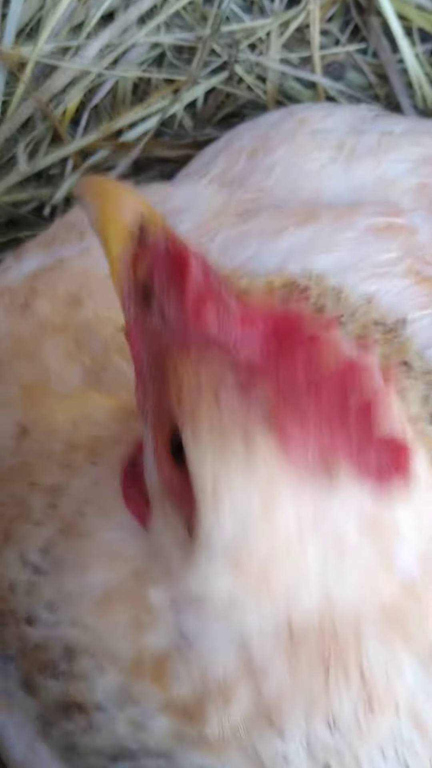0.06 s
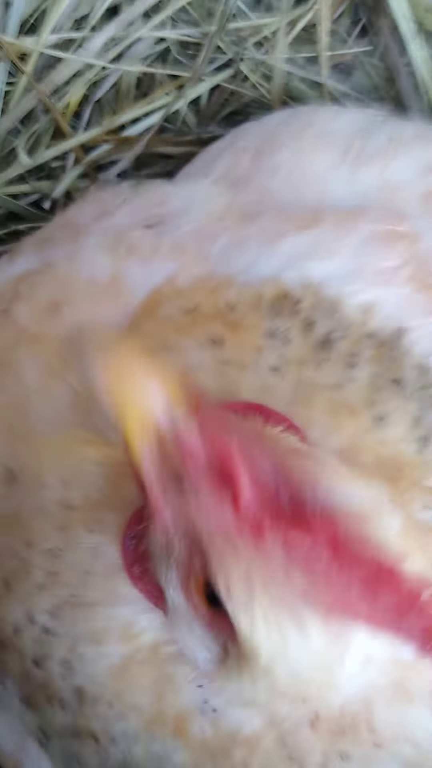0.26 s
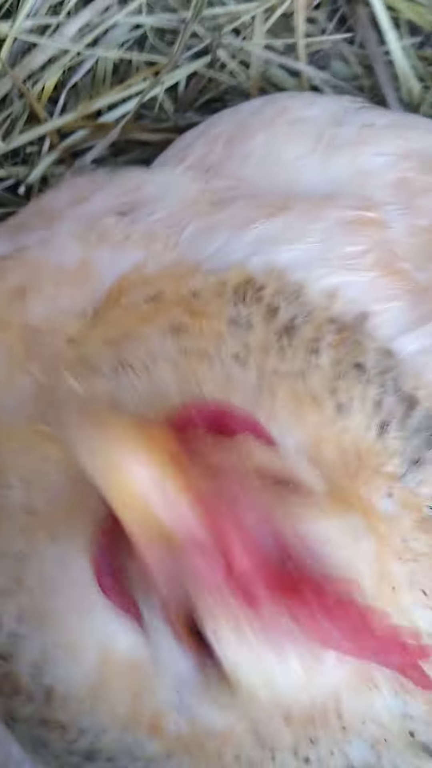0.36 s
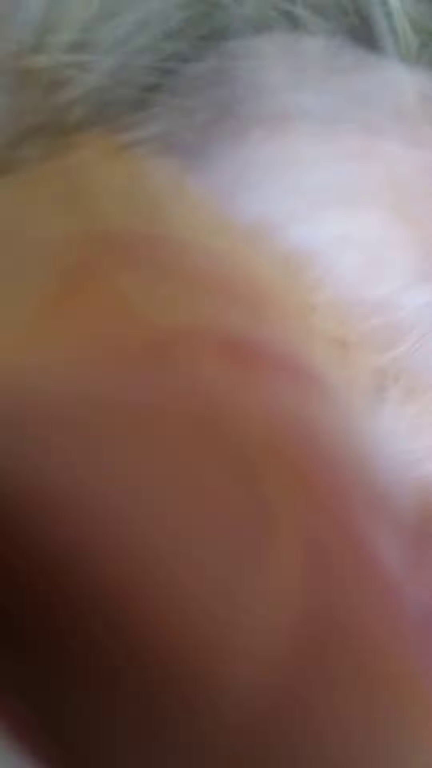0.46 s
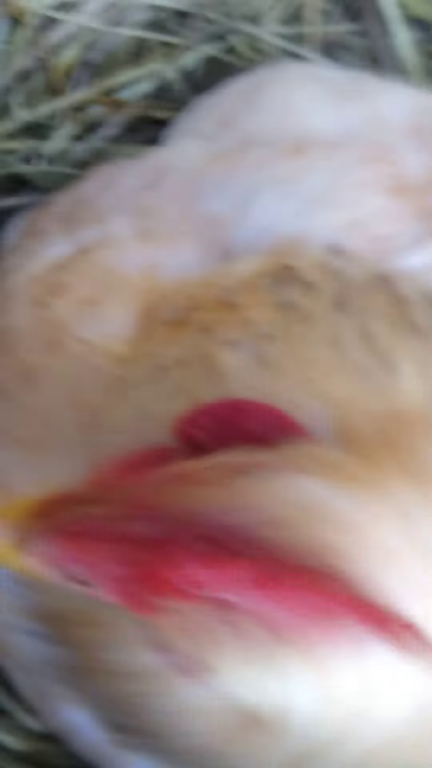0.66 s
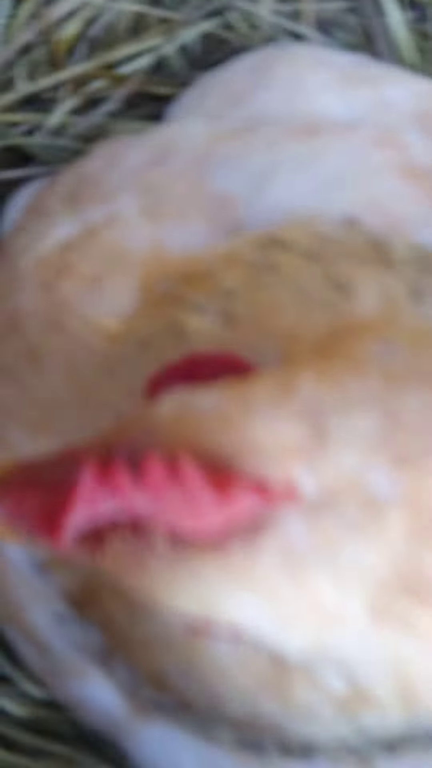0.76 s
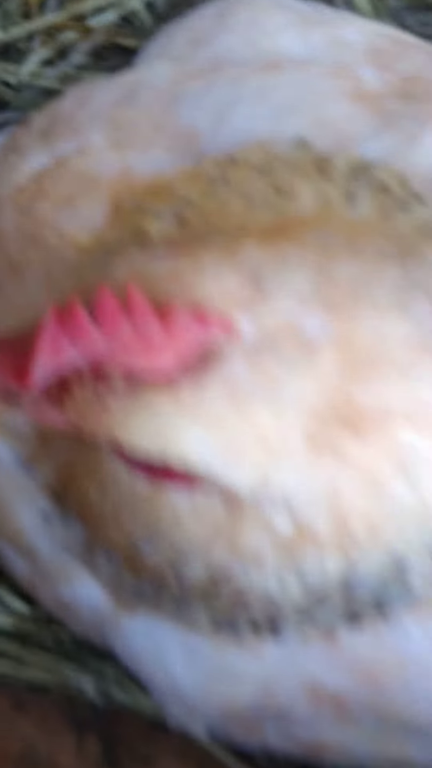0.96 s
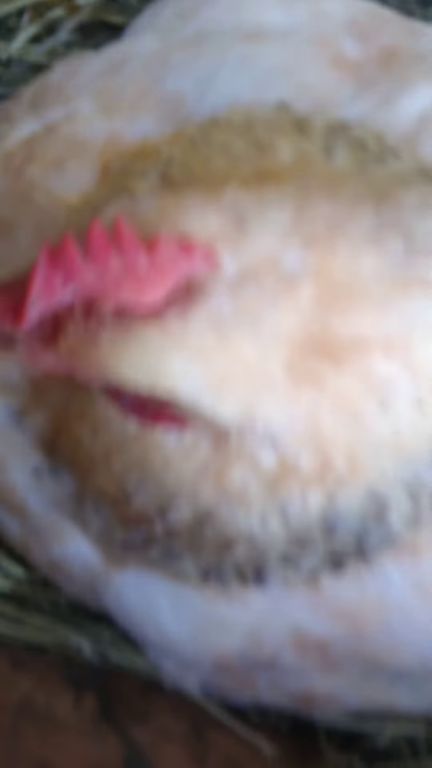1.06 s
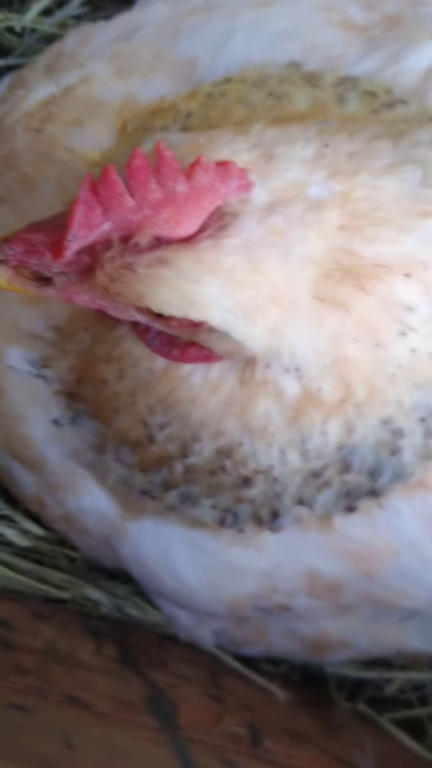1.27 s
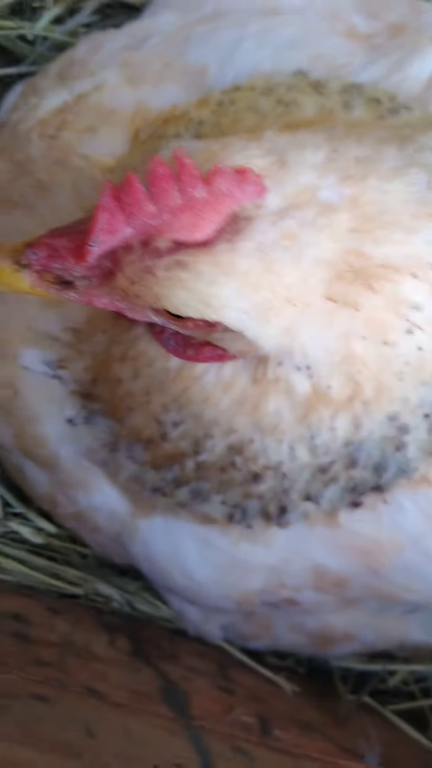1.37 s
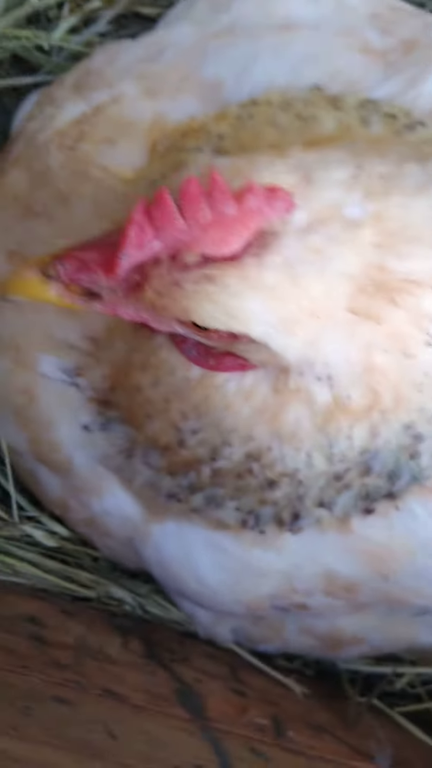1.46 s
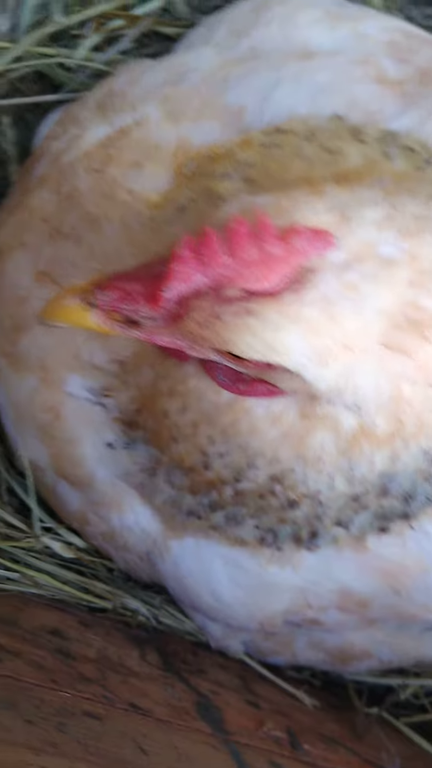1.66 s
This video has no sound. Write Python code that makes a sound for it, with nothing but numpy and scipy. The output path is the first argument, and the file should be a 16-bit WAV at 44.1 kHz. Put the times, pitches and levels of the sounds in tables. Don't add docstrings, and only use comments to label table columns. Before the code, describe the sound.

A nesting hen gives one short fluttering growl, then pecks the microphone with a loud overloaded crack

```python
import sys
import numpy as np
from scipy import signal
from scipy.fft import rfft, irfft
from scipy.io import wavfile
from scipy.ndimage import uniform_filter1d

SR = 44100
rng = np.random.default_rng(int(sys.argv[2]) if len(sys.argv) > 2 else 0)


def inscribe(sig):
    pcm = np.round(np.clip(np.atleast_2d(sig).T, -1, 1) * 32767)
    wavfile.write(sys.argv[1], SR, pcm.astype(np.int16))


def undo_db(level):
    steps = np.asarray(level, float) / 20
    return 10 ** steps


N = 74970

# frequency in Hz, level in dB per Hz.
RUMBLE_TONE = [(25, -35.5), (60, -9.5), (105, -2), (140, -11.5), (240, -41), (500, -38), (2500, -44),
               (16300, -54.5)]
# start in seconds, left level in dB, right level in dB, pitch in Hz, time to fall by 60 dB in seconds.
BUMPS = [(0.162, -46, -53, 575, 0.2), (0.228, -34, -33.5, 2350, 0.015), (.2285, -37, -48, 3640, .012),
         (.57, -47, -48, 423, .05), (.177, -34, -36, 520, .05), (.18, -35, -37, 930, .04),
         (.639, -27, -32, 450, .035), (.779, -52, -56, 780, .02), (.6142, -30, 2, 850, .005),
         (.6146, -30, -8, 2000, .004), (.6172, -30, -6, 650, .006), (.6268, -12, 1, 750, .0045),
         (.6275, -14, -8, 2200, .004), (.631, -34.5, -15.5, 372, 0.029), (.6375, -33, -25.5, 700, .01),
         (.84, -54.5, -58.5, 720, 0.027), (1.021, -51.5, -58.5, 900, 0.017), (1.036, -46.5, -69, 800, .02),
         (1.04, -49, -55, 544, 0.074), (1.103, -62.5, -69, 535, 0.12), (1.107, -53, -58, 220.8, 0.064),
         (1.151, -52, -58, 210, .05), (1.33, -72.5, -68.5, 1700, .04)]
# time in seconds, effort in dB, low voice in Hz,
# high voice in Hz, share of the high voice in dB, beak opening in dB.
GROWL = [
    (.172, -57.5, 520.4, 900, -2, -62),
    (.197, -28.5, 309.5, 625.9, 5.5, -29.5),
    (.245, -30.5, 430.2, 628.8, -8, -18.5),
    (.315, -29, 430.3, 637.1, -9.5, -14),
    (.345, -27, 373.2, 638.8, -4, -16),
    (0.364, -26.5, 437.4, 664.8, -10.5, -22.5),
    (0.439, -26.5, 422.2, 665.2, -7, -25),
    (.49, -22, 359.4, 662.7, 2.5, -23.5),
    (.536, -29.5, 351.6, 634.5, 3, -22.5),
]
# frequency in Hz, width in Hz, level in dB.
THROAT = [(145, 110, -12), (233.7, 96, -3), (398, 370, -3), (654.4, 340, -7), (900, 250, -5),
          (1174, 170, -7.5), (1420, 120, -11), (1660, 230, -10.5)]
# frequency in Hz, width in Hz, level in dB, change as it narrows in dB.
BEAK = [(2420, 1160, 2, -5), (3750, 2000, -7.5, -10), (5550, 1700, -22, 10.5), (9100, 12400, -1.5, 0.5)]
# frequency in Hz, left minus right in dB.
HEN_PAN = [(170, 3), (430, 3), (700, 3), (900, 0.5), (1200, -9), (1500, 4), (2400, 2), (5000, -2)]
# frequency in Hz, lead in radians.
HEN_LEAD = [(400, 0), (950, .2), (1150, 1.1), (1400, 2.1), (1850, 2.6), (2100, .4)]
# time in seconds, level in dB, left minus right in dB.
STRAW = [(0.202, -91, -17), (.51, -83, -11), (0.551, -50.5, -2), (.6, -53.5, 0.5), (0.653, -40, 1),
         (0.691, -51, 1.5), (.8, -55, 0.5), (0.878, -60.5, 5.5), (0.952, -74.5, 28), (1.019, -76, 18),
         (1.099, -84.5, 31.5), (1.25, -98, 11.5)]
# frequency in Hz, level in dB per Hz.
STRAW_TONE = [(150, 5), (230, 9), (450, -2), (1500, -6.5), (4000, -8), (8000, -8), (13000, -4),
              (16000, -14)]
# loudest moment in seconds, left level in dB, right level in dB,
# centre in Hz, length in seconds.
RATTLE = [(.229, -36, -36, 10000, .0008), (.612, -26, -30, 5000, .0012), (.6141, -3, -5, 8500, .0003),
          (.617, 0, -11, 10500, .0004), (.6232, -15, -34, 12500, .0002), (.6243, -7, -26, 12500, .0003),
          (.6272, -30, -9, 6000, .0002), (.628, -16, -5, 8500, .0002), (.63, -4, -26, 12000, .0003),
          (.631, -8, -30, 11000, .0003), (.6389, -7, -33, 12500, .0004), (.6453, -10, -36, 12500, .0003),
          (.6538, -18, -42, 11500, .0003), (1.285, -76, -66, 12000, .001), (1.395, -76, -64, 12000, .001),
          (1.51, -78, -68, 12000, .001)]
# frequency in Hz, level in dB, time to fall by 60 dB in seconds.
CASE = [(110, -12, .03), (190, -11, .025), (900, -11, .016), (1480, -8, .014), (1800, -7, .014),
        (2360, -5, .014), (3330, -9, .012), (4500, -10, .01)]
# frequency in Hz, level in dB, time to fall by 60 dB in seconds.
HUM = [(99, -16, .2), (99.5, -23, 1.1), (258, -20, .26), (200, -28, .3)]
# start in seconds, left level in dB, right level in dB, pitch factor.
KNOCKS = [
    (.779, -52, -56, 2.2),
    (1.02, -45, -53, .85),
    (1.0515, -33, -41, .98),
]
# frequency in Hz, level in dB, time to fall by 60 dB in seconds.
WOOD = [(249.5, 1, 0.046), (398, -12.5, 0.019), (582.4, -1, 0.029), (751, -2.5, 0.021), (961, -5, 0.02)]
# start in seconds, length in seconds, level in dB, start pitch in Hz, end pitch in Hz.
BIRDS = [
    (1.0, .009, -73, 4700, 4400),
    (1.062, 0.068, -70, 2350, 3700),
    (1.13, 0.0086, -64, 4550, 2480),
    (1.143, 0.048, -70, 3550, 2800),
    (1.219, 0.0081, -59.5, 4297, 2478),
    (1.252, .009, -59, 7650, 5750),
    (1.288, 0.008, -65, 7600, 5800),
    (1.61, 0.09, -84, 5020, 4000),
]


def evened(x):
    return x / np.sqrt(np.mean(x ** 2) + 1e-20)


def read(points, hz):
    f, value = np.transpose(points)
    return np.interp(np.log(hz + 1), np.log(f + 1), value)


def sides(left_db, right_db):
    return undo_db([[left_db], [right_db]])


def add(mix, s, sound):
    part = mix[:, round(s * SR):][:, :sound.shape[1]]
    part += sound[:, :part.shape[1]]


def resonate(x, hz, width):
    turn = np.exp(2j * np.pi * hz * np.arange(x.shape[-1]) / SR)
    r = np.exp(-np.pi * width / SR)
    return 2 * (turn * signal.lfilter([1 - r], [1, -r], x / turn)).real


def resonate_twice(x, hz, width):
    return resonate(resonate(x, hz, width), hz, width)


def ring(modes, t, factor=1):
    return sum(undo_db(db - 60 * t / t60) * np.sin(2 * np.pi * hz * factor * t) for hz, db, t60 in modes)


def hiss(tone, patchy_db, flicker_db):
    frames, hz = N // 128 + 5, np.fft.rfftfreq(512, 1 / SR)
    a, b, c, d, patches = rng.standard_normal((frames, 257, 5)).T
    patches = uniform_filter1d(patches, size=8, axis=0)
    patches = evened(uniform_filter1d(patches, size=12, axis=1))
    flicker = evened(uniform_filter1d(rng.standard_normal(frames), size=3))
    level_db = read(tone, hz)[:, None] + patchy_db * patches + flicker_db * flicker
    spectrum = np.array([a + 1j * b, c + 1j * d]) * undo_db(level_db)
    return evened(signal.istft(spectrum, nperseg=512, noverlap=384)[1][:, :N])


def tail(x, t60):
    t = np.arange(SR // 2) / SR
    signs = rng.choice([-1., 1.], (2, len(t)))
    present = rng.random((2, len(t))) < .05
    taps = signs * present * undo_db(-60 * t / t60) * (t > .003)
    return signal.fftconvolve(x[None], taps / np.linalg.norm(taps[0]), axes=1)[:, :N]


def rumble():
    floor = hiss(RUMBLE_TONE, patchy_db=1.5, flicker_db=.5)
    mic = signal.butter(4, [48.3], "high", fs=SR, output="sos")
    floor = signal.sosfilt(mic, floor)
    return undo_db(-68) * (floor + 0.57 * floor[::-1])


def bumps():
    out, t = np.zeros((2, N)), np.arange(SR) / SR
    for s, left_db, right_db, hz, t60 in BUMPS:
        soft_start = np.minimum(t * hz, 1)
        add(out, s, sides(left_db, right_db) * ring([(hz, 0, t60)], t) * soft_start)
    return out


def growl():
    flutter_hz, flutter_wander, flutter_bend, jitter = 56, .03, .115, .03
    flutter_top_s = .393
    flutter_depth, level_lead = .22, 1.9
    weak_pulse, skew, throb, beat, rough = .25, .9, .9, .55, .2
    t, (s, *cols) = np.arange(N) / SR, np.transpose(GROWL)
    effort_db, low_hz, high_hz, share_db, beak_db = (np.interp(t, s, c) for c in cols)

    drift = evened(uniform_filter1d(rng.standard_normal((3, N)), size=150))
    wander = evened(uniform_filter1d(drift[1], size=900))
    beats = 2 * np.pi * np.cumsum(flutter_hz * (1 + flutter_wander * wander)) / SR
    beats = beats - beats[round(flutter_top_s * SR)]
    flutter = np.cos(beats)
    low_bend = flutter_bend * np.interp(t, [.3, .34], [.5, 1.1])
    low = np.cumsum(low_hz * (1 + low_bend * flutter + jitter * drift[0])) / SR
    high = np.cumsum(high_hz * (1 + 0.27 * flutter_bend * flutter + jitter * drift[2])) / SR

    folds = 0
    for k in range(1, 7):
        folds = folds + np.cos(2 * np.pi * k * low + skew * k * k)
        folds = folds + weak_pulse * np.cos(np.pi * (2 * k - 1) * low - k * k)
    other = sum(np.cos(2 * np.pi * k * high - skew * k * k) for k in range(1, 4))
    other = undo_db(share_db) * other * (1 - throb * flutter)
    product = beat * 2 * np.cos(2 * np.pi * low) * other

    puffs = evened((0.35 + np.exp(-(low % 1) / 0.44)) * rng.standard_normal((3, N)))
    drive = (1 - rough) * evened(folds + other + product) + rough * puffs[2]
    drive = drive * (1 + flutter_depth * np.cos(beats + level_lead))
    throat = sum((-1) ** k * undo_db(db) * resonate_twice(drive, f, w) for k, (f, w, db) in enumerate(THROAT))
    throat = throat / np.sqrt(abs(uniform_filter1d(throat ** 2, size=2000)) + 1e-9)

    narrowed = np.clip((t - 0.342) / 0.024, 0, 1)
    breath = puffs[:2] + 0.27 * drive
    beak = sum(undo_db(db + change_db * narrowed) * evened(resonate_twice(breath, f, w))
               for f, w, db, change_db in BEAK)
    level = undo_db(effort_db) * (t > s[0]) * np.clip((s[-1] - t) / 0.0022, 0, 1)
    last_pulse = ring([(263, -35, .08)], np.maximum(t - s[-1], 0))
    voice = level * throat + last_pulse

    f, side = np.fft.rfftfreq(N, 1 / SR), np.array([[.5], [-.5]])
    treble_edge = 1 + (f / 12000) ** 20
    heard = rfft(voice) * np.exp(1j * side * read(HEN_LEAD, f))
    heard = heard + rfft(level * undo_db(beak_db) * evened(beak)) / treble_edge
    nest_echo = undo_db(-12) * tail(voice, 0.025)
    return irfft(heard * undo_db(side * read(HEN_PAN, f)), N) + nest_echo


def straw():
    t, (s, db, pan_db) = np.arange(N) / SR, np.transpose(STRAW)
    level_db = np.interp(t, s, db, -120, -120) + np.array([[.5], [-.5]]) * np.interp(t, s, pan_db)
    return undo_db(level_db) * hiss(STRAW_TONE, patchy_db=.5, flicker_db=.8)


def rattle():
    out, t = np.zeros((2, N)), np.arange(800) / SR
    for s, left_db, right_db, hz, length in RATTLE:
        grit = evened(resonate_twice(rng.standard_normal((2, 800)), hz, 7000))
        swell = (t / length) * np.exp(1 - t / length) / 2
        add(out, s - length, sides(left_db, right_db) * grit * swell)
    return out


def blow():
    peck_s, push_s, push_db = .6142, .6078, -11
    swing_db, swing_hold_s, swing_t60 = -1, .0058, .008
    out, t = np.zeros((2, N)), np.arange(SR) / SR
    push = (t / .003) ** 2 * np.exp(2 - 2 * t / .003)
    add(out, push_s, -sides(push_db, push_db - 25) * push)
    add(out, peck_s, sides(9, -22) * ring(CASE, t))
    swing_hz = 500 + 2130 * np.exp(-t / .0012)
    swing = np.sin(2 * np.pi * np.cumsum(swing_hz) / SR)
    swing = swing * undo_db(swing_db - 60 * np.maximum(t - swing_hold_s, 0) / swing_t60)
    add(out, peck_s, swing * sides(0, -30))
    return out


def case_hum():
    out, t = np.zeros((2, N)), np.arange(SR) / SR
    fade = np.cos(np.pi * np.minimum(t / .47, 1) / 2)
    rise = np.minimum(t / .11, 1) ** 2
    hum = ring(HUM[:1], t) - (fade * ring(HUM[1:2], t) + ring(HUM[2:], t)) * rise
    add(out, .6142, hum * sides(0, -27))
    return out


def knocks():
    out, t = np.zeros((2, N)), np.arange(SR) / SR
    soft_start = np.minimum(t / .003, 1) ** 2
    for s, left_db, right_db, factor in KNOCKS:
        add(out, s, sides(left_db, right_db) * -ring(WOOD, t, factor) * soft_start)
    return out


def birds():
    dry = np.zeros((2, N))
    for s, length, db, start_hz, end_hz in BIRDS:
        u = np.arange(0, length, 1 / SR) / length
        whistle = np.sin(2 * np.pi * np.cumsum(start_hz + (end_hz - start_hz) * u) / SR)
        swell = np.sqrt(np.sin(np.pi * u ** 1.4))
        tremble = 1 + .3 * evened(uniform_filter1d(rng.standard_normal(len(u)), size=60))
        in_the_open = length > .01
        add(dry, s, undo_db(db) * whistle * swell * tremble * np.array([[in_the_open], [1]]))
    return dry[0] * sides(2, -3) + undo_db(4) * tail(dry[1], .7)


def scene():
    hits = bumps() + rattle() + blow() + case_hum() + knocks()
    coop_echo = undo_db(-26) * tail(hits[1], 0.72)
    return rumble() + growl() + straw() + hits + coop_echo + birds()


def low_pass(x):
    return signal.sosfilt(signal.butter(12, 16430, fs=SR, output="sos"), x)


def record(dry):
    overloaded = np.clip(dry, -.93, .93)
    treble_cut = signal.firwin(255, 16300, fs=SR)
    mix = signal.oaconvolve(overloaded, treble_cut[None], "same")
    return low_pass(np.clip(mix, -1, 1))


dry = scene()
out = record(dry)
inscribe(out)
```